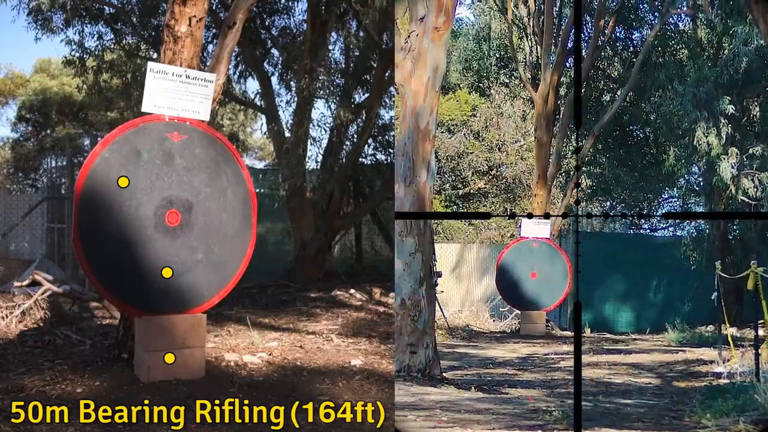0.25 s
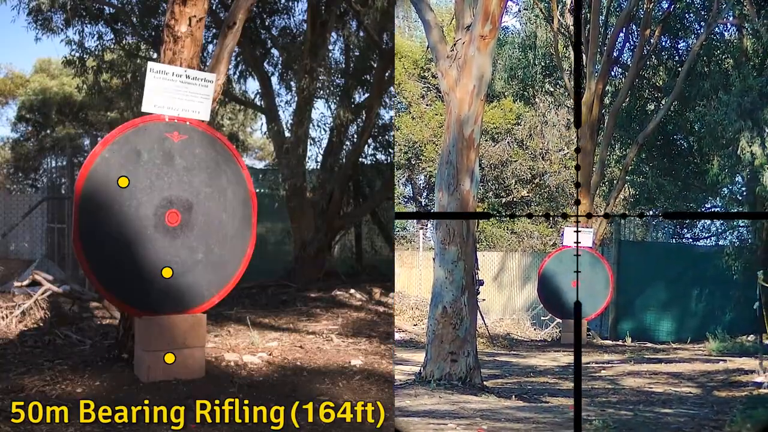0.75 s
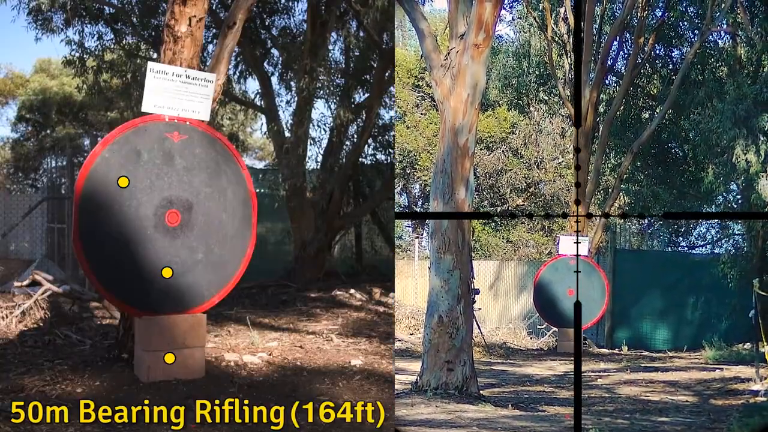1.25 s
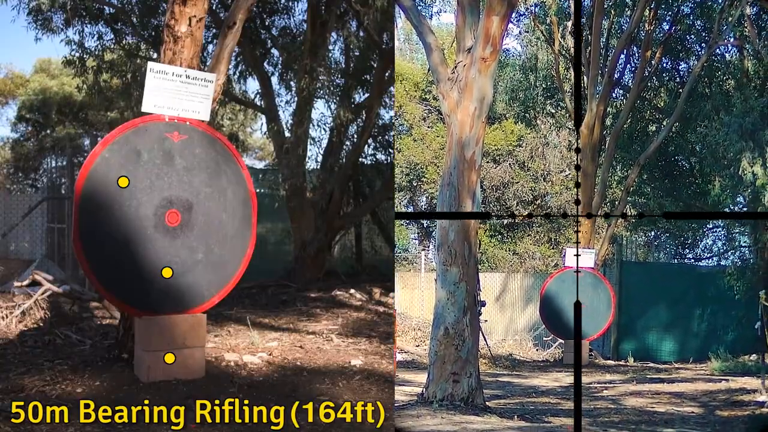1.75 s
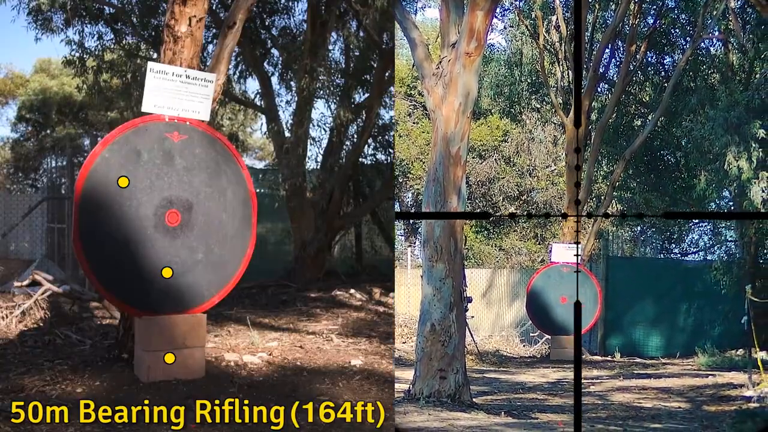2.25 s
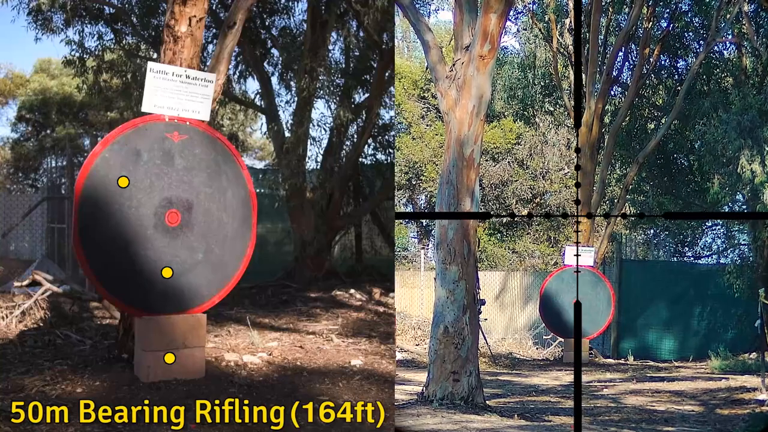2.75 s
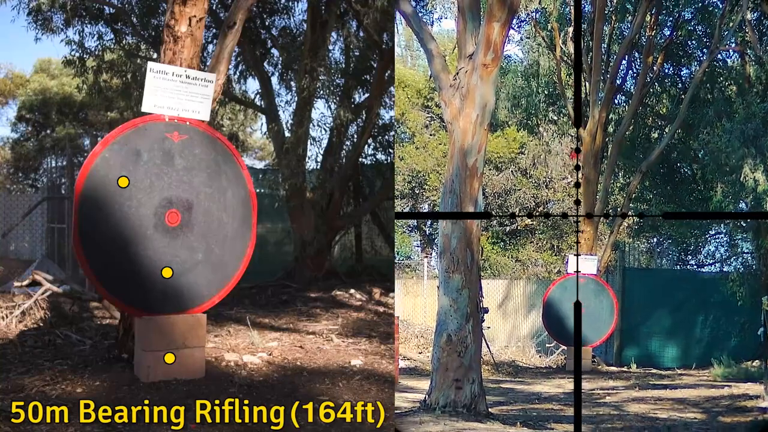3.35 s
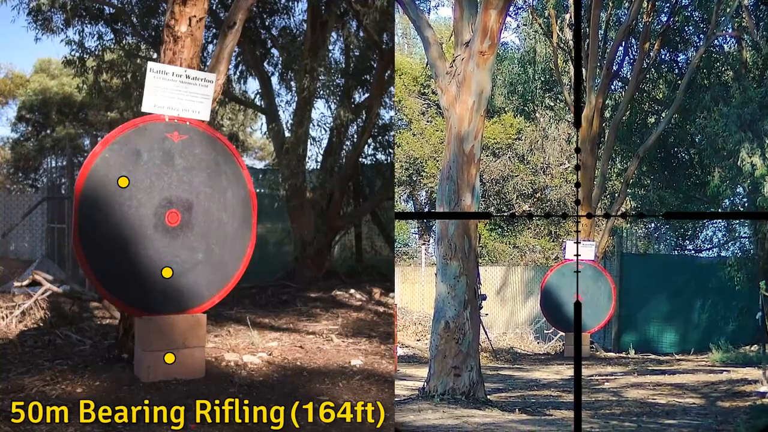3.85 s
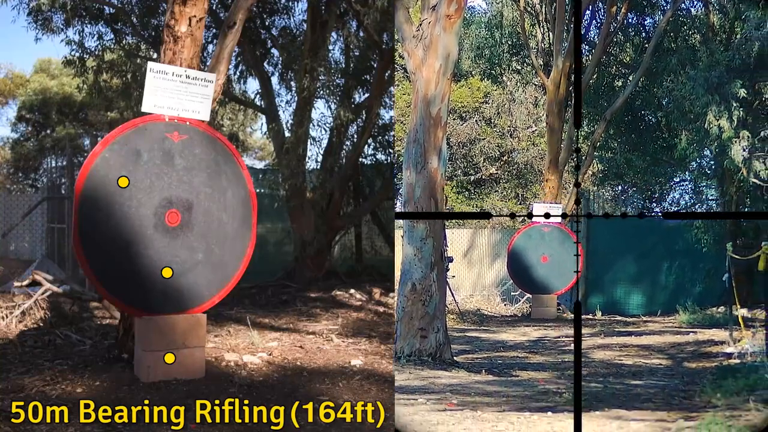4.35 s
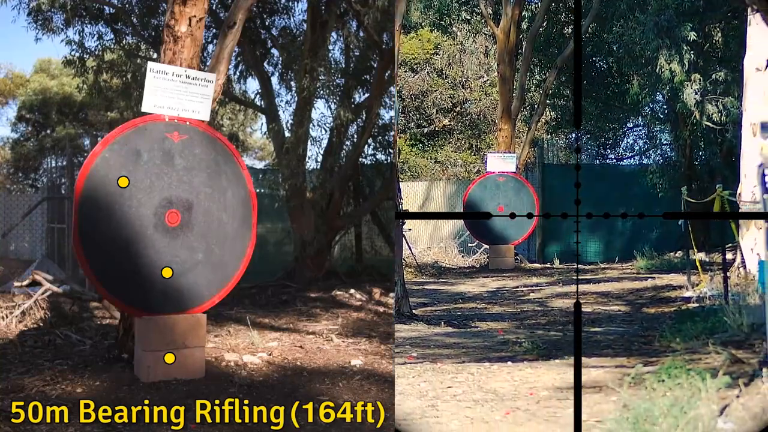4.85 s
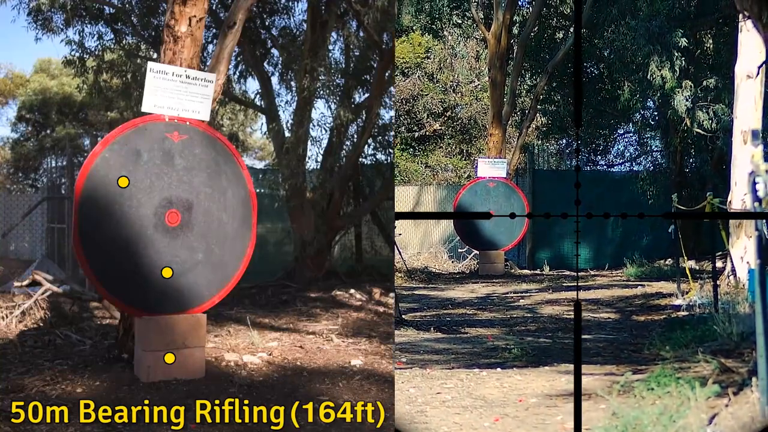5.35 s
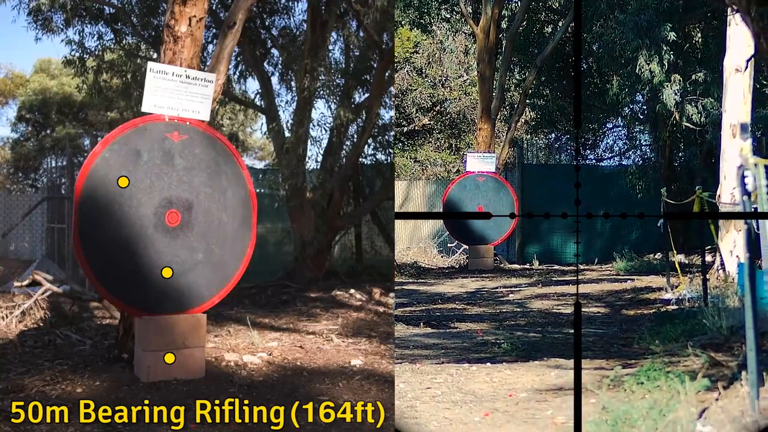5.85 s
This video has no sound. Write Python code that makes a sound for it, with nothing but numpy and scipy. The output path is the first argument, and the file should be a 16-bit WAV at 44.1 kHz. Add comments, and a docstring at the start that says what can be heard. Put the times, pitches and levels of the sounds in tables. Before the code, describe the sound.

Outdoors among trees, low wind rumble, faint leaf hiss and small chirping birds fill the first three seconds. Right beside the microphone a spring-powered plastic dart blaster fires once: a very quick crunching build-up, a loud clacking slam, low thump and ringing, rattling spring that dies away with small knocks. A faint pulsing whistle then falls in pitch as the dart flies, ending in a sharp, dry, hollow knock with short echoes.

```python
"""A yard with trees: a spring-powered foam dart blaster fires once, right beside the microphone.
Shaped noise bursts make the quick build-up, the slamming plunger and the knocks on the plastic shell;
damped sines make the ringing spring and thumping stock, and dense random clicks make the spring rattle.
The spinning dart whistles on two falling tones and lands with one dry, hollow knock of damped sines.
Filtered noise makes wind rumble, leaf hiss and twig ticks; gliding whistles make the small birds."""
import sys
import numpy as np
from scipy import signal
from scipy.fft import rfft, irfft, next_fast_len
from scipy.io import wavfile
from scipy.ndimage import uniform_filter1d, minimum_filter1d

SR = 44100
rng = np.random.default_rng(int(sys.argv[2]) if len(sys.argv) > 2 else 0)


def generate_wav(signal):
    """Clip the signal to [-1, 1] and save it as 16-bit WAV at the path in sys.argv[1]."""
    frames = np.transpose(np.atleast_2d(signal))
    scaled = np.clip(frames, -1, 1) * 32767
    pcm = np.round(scaled).astype(np.int16)
    wavfile.write(sys.argv[1], SR, pcm)


N = 269274
TIME = np.arange(N) / SR  # seconds

# The shot builds in three quick steps, each louder than the one before.
BUILD_S, BUILD_STEP_S, BUILD_DB, BUILD_RISE_DB, BUILD_T60_S = 3.017, .021, -43.5, 13, .14
# Blows on the shell, the release first.
# Each row: start in seconds, relative level in dB, t60 in seconds, tilt in dB per octave.
BLOWS = [(3.0795, -3, 0.055, -2.5), (3.086, -10, 0.067, 2), (3.158, -23.5, 0.11, 5.5),
         (3.194, -24, 0.066, 4.5), (3.262, -24.5, 0.13, 0.5), (3.353, -25, 0.24, -2),
         (3.556, -31, 0.17, -2.5), (3.697, -32, .07, -1.5), (3.743, -26, 0.056, -4),
         (3.7709, -17, .035, -5.5), (4.2928, -29.5, 0.024, -4.5)]
# The spring hits the end of its tube, the first time with the plunger. Each row: start in seconds,
# blow level in dB, blow tilt in dB per octave, ring level in dB, chatter level in dB (levels relative).
SURGES = [(3.1107, -7, 1.5, -32, -21.5), (3.401, -27.5, 2, -27.5, -32), (3.7035, -17.5, -1, -31, -48.5)]
SURGE_T60_S, RING_RISE_S = 0.059, 0.0045
CHATTER_RISE_S, CHATTER_HOLD_S, CHATTER_T60_S = .012, 0.077, 1.0
BLASTER_PAN_DB = 1  # left minus right
# Colour of the plastic shell. Each row: frequency in Hz, gain in dB.
SHELL_COLOUR = [(100, -8), (250, -7), (400, -4.5), (550, -0.5), (760, 2.5), (1050, -4), (1400, -1.5),
                (1700, -8), (2400, -9), (2800, -18.5), (3500, -14.5), (4500, -27), (6100, -27.5),
                (7200, -43), (9000, -72)]
# Long modes of the coil spring. Each row: frequency in Hz, relative level in dB, t60 in seconds.
SPRING_MODES = [(440, -12, 1.62), (449, -10.5, 1.2), (477, -8.5, .6), (548.5, -10, 0.97),
                (583.6, -5.5, 1.58), (659, -4, 0.45), (702, -4.5, 0.45), (790, -7, 0.38), (987, -4.5, 0.36),
                (1392, -2.5, 0.26), (1414, -7.5, 0.22)]
# Resonances of the coils chattering in their tube. Each row: frequency in Hz, width in Hz, gain in dB.
COIL_RESONANCES = [(450, 24, -1.5), (611, 30, -4.5), (676, 13, -3), (757, 12, -1.5), (740, 18, -4),
                   (865, 11, -5.5), (1000, 30, 1), (1070, 40, -2.5), (1330, 45, -5), (1504, 65, 5),
                   (1825, 71, 2.5), (1920, 45, 0), (2117, 60, -2.5), (2440, 99, -4), (2740, 77, -4.5),
                   (2990, 210, -4.5), (3226, 97, -5), (3540, 110, -8.5), (3870, 79, -22.5),
                   (5390, 250, -26), (6100, 230, -30)]
# Low modes of the stock. Each row: frequency in Hz, level in dB, t60 in seconds.
STOCK_MODES = [(69.1, -23.5, 0.94), (97.2, -11, 0.33), (124.4, -11, 0.24), (146.9, -18, .6),
               (155.4, -13, 0.79), (186, -22.5, 1), (253, -19.5, .1), (333, -18.5, .15)]
# Recoil of the whole blaster. Each row: frequency in Hz, level in dB, t60 in seconds.
RECOIL_MODES = [(25.7, -11, 0.33), (89.4, -10, 0.16)]
RECOIL_S, SLAM_S = 3.090, 3.114
# Flight of the dart as it slows and comes nearer.
# Each row: time in seconds, whistle centre pitch in Hz, relative level in dB.
FLIGHT = [(4.749, 5990, -89), (5.0, 5440, -79), (5.25, 4800, -74), (5.43, 4020, -68), (5.6, 3800, -66),
          (5.722, 3750, -63.5)]
# turns per second, then pitch depths as fractions, then the level sent to the tree echo
SPIN_HZ, SPIN_WOBBLE, WHISTLE_ROUGH, WHISTLE_ECHO_DB = 17.5, .02, .025, -9
# Hollow knock and the ticks after it.
# Each row: start in seconds, relative level in dB, tilt in dB per octave.
KNOCKS = [(5.7249, -1, 0.5), (5.7263, -13, -5.5), (5.781, -31, 1.5), (5.938, -33, -0.5), (5.942, -35, -8),
          (5.965, -38, 4)]
# Modes of the knocked thing. Each row: frequency in Hz, relative level in dB, t60 in seconds.
HOLLOW_MODES = [(453, -36.5, 0.84), (673, -51.5, .02), (940, -17, 0.044), (881, -27.5, 0.28),
                (1230, -39, 0.32), (1424, -8, 0.015), (1794, -17.5, 0.032), (1930, -40.5, 0.28),
                (2320, -39.5, 0.29), (2600, -28, 0.013), (4180, -25, 0.0058), (5830, -25, 0.0076),
                (7250, -39.5, 0.0085), (9400, -35, 0.0028)]
# Echoes of the knock off nearby surfaces. Each row: delay in seconds, level in dB.
KNOCK_SLAPS = [(.029, -22.5), (.056, -26.5), (.104, -32)]
# Bird calls, built of rising notes. Each row: delay in seconds, length in seconds, start in Hz,
# end in Hz (both before the pitch ratio), relative level in dB, second and third harmonic in dB.
TWO_STROKE = [(0, 0.03, 2130, 2720, -9, 8, -40), (.026, 0.027, 3500, 4250, 2, -40, -49),
              (.03, .05, 2400, 2840, -7, -40, -50)]
PEEP = [(0, .05, 2400, 2760, 0.0086, -6.5, -10)]
UPSWEEP = [(0.0011, .045, 2560, 3330, 0, -10.5, -32)]
LOW_PHRASE = [(0, 0.0555, 1070, 1384, -4.5, 2.5, -30), (.049, 0.0414, 1804, 2120, 2.5, -35, -45),
              (.087, .04, 1878, 2080, 1.5, -35, -45)]
LOW_SLUR = [(0.00054, 0.12, 1180, 1560, 0, -17, -35)]
# When each call is sung. Each row: start in seconds, relative level in dB, pitch ratio.
TWO_STROKE_AT = [(0, -57, 0.95), (.696, -56, .99), (1.787, -61.5, 1.09), (2.575, -56.5, 1.006)]
UPSWEEP_AT = [(.065, -59.5, 1.04), (.14, -60, 1.05), (.767, -62, 1.03), (1.23, -70, 1.07),
              (1.607, -63.5, .96), (2.286, -69.5, 1.1), (2.645, -63, 0.95)]
LOW_PHRASE_AT = [(4.819, -55.5, 1.0)]
LOW_SLUR_AT = [(5.09, -61.5, 0.98), (5.41, -69.5, 1.0)]
PEEP_S, PEEP_EVERY_S, PEEP_DB = .305, .626, -67  # one bird peeps at a steady pace
NOTE_WAVER = 0.022  # rms pitch waver, as a fraction
SONG_DB, SONG_ECHO_DB, SONG_T60_S = 0.5, -2, 0.59
# Blurred calls of far birds. Each row: centre time in seconds, spread in seconds,
# frequency in Hz, width of each filter pass in Hz, level in dB.
FAR_CALLS = [(.02, 0.47, 2130, 420, -64), (4.67, 0.3, 1070, 83, -64), (4.58, .22, 1680, 220, -71),
             (5.499, 0.15, 2120, 913, -63.5)]
# Spectra of the first and the quieter second background air.
# Each row: frequency in Hz, relative density in dB.
AIR_EARLY = [(20, -7), (43, 3), (97, -1.5), (150, -3.5), (293, -20), (446, -30.5), (1320, -31), (1820, -43),
             (2690, -46), (4100, -48), (4600, -56.5), (7220, -54.5), (9200, -62), (11200, -62.5),
             (11800, -50), (12600, -67), (15500, -65)]
AIR_LATE = [(20, 2), (49, -0.5), (86, -3), (127, -11), (179, -21), (350, -30.5), (620, -25.5), (790, -30.5),
            (950, -39.5), (1110, -36.5), (1900, -41), (2700, -52.5), (3800, -52.5), (5000, -58),
            (6100, -56), (7300, -59.5), (10500, -63), (12000, -79)]
EARLY_DB, LATE_DB, CHANGE_S = -37, -39.5, 2.88
# Wind rumble on the microphone. Each row: time in seconds, gain in dB.
WIND = [(0, -1), (.9, 1.5), (1.7, -0.5), (4.3, -4.5), (4.7, 0), (6.1, -1)]
# Stir of the leaves. Each row: time in seconds, gain in dB.
LEAVES = [(0, 4.5), (.6, 0), (3.0, 0), (4.7, 3.5), (5.3, 0.5), (6.1, 1.5)]
# Late gusts. Each row: centre time in seconds, spread in seconds, frequency in Hz, level in dB.
GUSTS = [(4.46, 0.06, 99.6, -36.5), (4.528, 0.038, 86.4, -39.5), (4.73, 0.044, 75, -38)]
# Dry ticks among the leaves. Each row: start in seconds, relative level in dB.
TWIGS = [(.017, -43.5), (0.518, -59), (2.204, -56), (2.48, -63), (4.136, -59.5)]
# Colour of the echo off trees and fence. Each row: frequency in Hz, relative gain in dB.
YARD_COLOUR = [(100, 10), (500, -18), (1800, -7.5), (2400, -4), (3300, -14.5), (8000, -26.5), (12000, -53)]
# Colour difference of the two microphone ports. Each row: frequency in Hz, left minus right in dB.
PORTS = [(60, -0.5), (250, -2), (500, 0.15), (2000, 0), (4500, 0.5), (9000, 2)]
TOP_HZ, LIMITER_SAMPLES = 15700, 89


def undb(db):
    """Turn decibels into gain."""
    return 10 ** (np.asarray(db) / 20)


def unit(x):
    """Scale to rms 1."""
    return x / np.sqrt(np.mean(x ** 2))


def fade(t, t60):
    """Exponential decay that drops 60 dB in t60 seconds."""
    return np.exp(-np.log(1000) * t / max(t60, 1e-3))


def add(out, s, x):
    """Mix x into out from time s on."""
    i = max(int(s * SR), 0)
    out[..., i:i + x.shape[-1]] += x[..., :N - i]


def colour(x, points, tilt_db=0):
    """Filter by a (Hz, dB) spectrum, tilted about 1 kHz in dB per octave."""
    size = next_fast_len(x.shape[-1], real=True)
    octave = np.log2(np.fft.rfftfreq(size, 1 / SR) + 1)
    hz, db = np.transpose(points)
    tilt = tilt_db * (octave - np.log2(1000))
    gain = undb(np.interp(octave, np.log2(hz), db) + tilt)
    return irfft(rfft(x, size) * gain, size)[..., :x.shape[-1]]


def resonate(x, modes):
    """Pass x through parallel (Hz, width, dB) resonances."""
    size = next_fast_len(x.shape[-1], real=True)
    f = np.fft.rfftfreq(size, 1 / SR) + 1e-6  # keeps clear of dividing by zero
    response = sum(undb(db) / (1 + 1j * (f * f - hz * hz) / (f * width)) for hz, width, db in modes)
    return irfft(rfft(x, size) * response, size)[..., :x.shape[-1]]


def ring(modes, scatter=0):
    """Damped sines set off by one blow; scatter loosens their phases."""
    t = TIME[:2 * SR]
    out = np.zeros(len(t))
    for hz, db, t60 in modes:
        cycles = hz * t + scatter * rng.random()
        out += undb(db) * fade(t, t60) * np.sin(2 * np.pi * cycles)
    return out


def stereo(mid, side, side_db):
    """Left and right from a middle signal and a side signal of opposite sign in each ear."""
    return mid + undb(side_db) * side * np.array([[1], [-1]])


def walk(rate):
    """Random wander with a spread near 1, from smoothed steps at the given rate in Hz."""
    k = int(SR / rate)
    steps = np.repeat(rng.standard_normal(N // k + 1), k)
    return np.sqrt(2) * uniform_filter1d(uniform_filter1d(steps, k), k)[:N]


def echo(x, spectrum, t60, rise_s):
    """Diffuse outdoor scatter that builds up and dies away, different in each ear."""
    t = TIME[:SR]
    noise = colour(stereo(*rng.standard_normal((2, SR)), side_db=-16.5), spectrum)
    tail = noise * fade(t, t60) * (1 - np.exp(-(t / rise_s) ** 2))
    tail /= np.sqrt(np.sum(tail ** 2) / 2)  # unit energy per ear on average
    return signal.fftconvolve(x[None], tail, axes=1)[:, :N]


def swell(s, spread_s, hz, width_hz, db):
    """A narrow band of noise that rises and falls about time s."""
    band = [(hz, width_hz, 0)]
    noise = unit(resonate(resonate(rng.standard_normal(N), band), band))
    return undb(db) * noise * np.exp(-((TIME - s) / spread_s) ** 2)


def crunch(db, t60, tilt_db):
    """One crunching noise burst coloured like the plastic shell: fast-dying, with a short soft onset."""
    t = TIME[:SR // 2]
    mid, side = rng.standard_normal((2, len(t)))
    side = colour(side, [(600, -1.5), (2500, -2.5), (5000, 6.5)])  # treble reaches the ports less alike
    shell = unit(colour(stereo(mid, side, side_db=-13.5), SHELL_COLOUR, tilt_db))
    pan = undb(np.array([[BLASTER_PAN_DB], [-BLASTER_PAN_DB]]) / 2)
    return undb(db) * pan * shell * fade(t, t60) * (1 - fade(t, 0.0045))


def build_up():
    """The shot builds in three quick steps of crunching noise, each louder than the one before."""
    out = np.zeros((2, N))
    for step in range(3):
        level_db = BUILD_DB + step * BUILD_RISE_DB
        add(out, BUILD_S + step * BUILD_STEP_S, crunch(level_db, BUILD_T60_S, tilt_db=0.4))
    return out


def release_and_knocks():
    """The catch lets go, then loose parts knock on the shell."""
    out = np.zeros((2, N))
    for s, db, t60, tilt_db in BLOWS:
        add(out, s, crunch(db, t60, tilt_db))
    return out


def spring_surges():
    """Each surge of the slack spring strikes the shell and sets the long modes of the coil ringing."""
    out = np.zeros((2, N))
    onset = 1 - np.exp(-TIME[:2 * SR] / RING_RISE_S)
    for s, db, tilt_db, ring_db, _ in SURGES:
        add(out, s, crunch(db, SURGE_T60_S, tilt_db))
        add(out, s, undb(ring_db) * ring(SPRING_MODES, scatter=0.87) * onset)
    return out


def shell_sound():
    """A small plastic shell radiates the blows and the ring, but neither deep bass nor fine treble."""
    out = build_up() + release_and_knocks() + spring_surges()
    return colour(out, [(40, -12.5), (120, 2), (7000, 1.5), (8500, -9.0), (10000, -41)])


def chatter():
    """The slack spring slaps its tube: dense uneven clicks that flare at each surge and die away."""
    t = TIME[:2 * SR] + SURGES[0][0]
    n = len(t)
    hits = (rng.random((2, n)) < 3200 / SR) * rng.standard_normal((2, n))  # 3200 clicks a second
    clicks = stereo(*hits, side_db=-10.5) * undb(1.5 * walk(89.96)[:n])
    coils = np.zeros((2, n))
    for mode in COIL_RESONANCES:
        # the contact point shifts along the coils, so each resonance comes and goes
        coils += resonate(clicks * undb(2.6 * walk(25)[:n]), [mode])
    body = unit(coils) + undb(-1.5) * unit(colour(clicks, SHELL_COLOUR, tilt_db=2.0))
    # the housing muffles the top
    body = colour(body, [(150, 13.5), (400, 9.5), (6200, -9.5), (7200, -17), (9000, -43)])
    flares = []
    for s, _, _, _, db in SURGES:
        rise = np.clip((t - s) / CHATTER_RISE_S, 0, 1)
        decay = fade(np.maximum(t - s - CHATTER_HOLD_S, 0), CHATTER_T60_S)
        flares.append(undb(db) * rise * decay)
    out = np.zeros((2, N))
    add(out, t[0], unit(body) * np.linalg.norm(flares, axis=0))  # flares add up in power
    return out


def thump():
    """Low damped modes: the blaster kicks at release, and its stock booms as the plunger lands."""
    out = np.zeros(N)
    add(out, RECOIL_S, -ring(RECOIL_MODES))
    add(out, SLAM_S, ring(STOCK_MODES))
    return out


def whistle():
    """The spinning dart whistles on two tones that pulse once a turn and fall as it slows, until it lands."""
    s, hz, db = np.transpose(FLIGHT)
    turn = 2 * np.pi * SPIN_HZ * (TIME - s[-1]) + .5 * walk(12)
    pitch = np.interp(TIME, s, hz) * (1 - SPIN_WOBBLE * np.sin(turn) + WHISTLE_ROUGH * walk(900))
    phase = 2 * np.pi * np.cumsum(pitch) / SR
    # the upper tone dies out as speed drops
    upper = np.interp(TIME, [5.0, 5.35], [1.3, 0]) * np.sin(1.26 * phase)
    pulses = (1 + .85 * np.cos(turn)) * undb(3 * walk(25) - 4.0)
    level = undb(np.interp(TIME, s, db, left=-140, right=-140))
    return pulses * (np.sin(phase) + upper) * level


def knocks():
    """The dart strikes something hollow: noise cracks and damped modes, a quick bounce, then faint ticks."""
    out, t = np.zeros(N), TIME[:SR]
    for s, db, tilt_db in KNOCKS:
        crack = undb(-29.0) * rng.standard_normal(SR) * fade(t, 0.024)
        hit = crack - ring(HOLLOW_MODES)[:SR]
        add(out, s, undb(db) * colour(hit, [(100, -12.5), (400, 0)], tilt_db))
    return colour(out, [(9800, -3), (11300, -16), (12500, -44)])


def call(notes, pitch):
    """One bird call: upward whistles with a wavering pitch and two overtones."""
    out = np.zeros(SR)
    for delay_s, length_s, start_hz, end_hz, db, second_db, third_db in notes:
        u = np.linspace(0, 1, int(length_s * SR))
        waver = NOTE_WAVER * unit(uniform_filter1d(rng.standard_normal(SR), size=40))[:len(u)]
        hz = pitch * (start_hz + (end_hz - start_hz) * u) * (1 + waver)
        phase = 2 * np.pi * np.cumsum(hz) / SR
        tone = np.sin(phase) + undb(second_db) * np.sin(2 * phase) + undb(third_db) * np.sin(3 * phase)
        envelope = np.sqrt(2 * np.abs(np.sin(np.pi * u)))
        add(out, delay_s, undb(db) * envelope * tone)
    return out


def birds():
    """Small birds sing five kinds of call, placed by their own times, levels and pitches."""
    out = np.zeros(N)
    peep_at = [(PEEP_S + k * PEEP_EVERY_S, PEEP_DB, 1) for k in range(5)]
    songs = [(TWO_STROKE, TWO_STROKE_AT), (PEEP, peep_at), (UPSWEEP, UPSWEEP_AT),
             (LOW_PHRASE, LOW_PHRASE_AT), (LOW_SLUR, LOW_SLUR_AT)]
    for notes, times in songs:
        for s, db, pitch in times:
            add(out, s, undb(db) * call(notes, pitch))
    return out


def far_birds():
    """Far calls, blurred into swelling narrow bands of noise."""
    return sum(swell(*far_call) for far_call in FAR_CALLS)


def air(spectrum):
    """Wind rumble and leaf hiss from noise; the bass is alike in both ears, the treble is wider."""
    mid, side = rng.standard_normal((2, N))
    side = colour(side, [(40, -31.5), (200, -13), (1000, -7.0), (6000, -3.5)])
    sound = unit(colour(stereo(mid, side, side_db=-2.0), spectrum))
    rumble = colour(sound, [(170, -0.5), (250, -10.0), (400, -33), (800, -71)])
    hiss = sound - rumble
    wind_db = np.interp(TIME, *np.transpose(WIND)) + 1.5 * walk(3.765)
    leaves_db = np.interp(TIME, *np.transpose(LEAVES)) + 0.13 * walk(9)
    return rumble * undb(wind_db) + hiss * undb(leaves_db)


def background_air():
    """Background air: one wind and leaf noise, then a quick change to a quieter one of another colour."""
    late = np.clip((TIME - CHANGE_S) / 0.014, 0, 1)
    return (1 - late) * air(AIR_EARLY) * undb(EARLY_DB) + late * air(AIR_LATE) * undb(LATE_DB)


def gusts():
    """Late gusts buffet the microphone as short low swells of noise."""
    return sum(swell(s, spread_s, hz, hz / 3, db) for s, spread_s, hz, db in GUSTS)


def twigs():
    """Twigs tick as short dry bursts of mid-treble noise."""
    out = np.zeros(N)
    for s, db in TWIGS:
        noise = rng.standard_normal(SR)
        snap = unit(colour(noise, [(1000, -13), (3000, 1), (4200, -2), (6000, -24), (12000, -28)]))
        add(out, s, undb(db) * snap * fade(TIME[:SR], 0.053))
    return out


def scene():
    """Blaster, flying dart, its knock and the birds, with their echoes in the windy yard."""
    blaster, dart, knock, song = shell_sound() + chatter(), whistle(), knocks(), birds()
    blaster_echo = echo(blaster.mean(axis=0), YARD_COLOUR, t60=0.98, rise_s=0.062)
    near = blaster + thump() + undb(-23) * blaster_echo
    tap = knock + undb(-20.0) * echo(knock, YARD_COLOUR, t60=0.6, rise_s=0.023)
    for delay_s, db in KNOCK_SLAPS:
        add(tap, delay_s, undb(db) * echo(knock, YARD_COLOUR, t60=0.074, rise_s=0.0029))
    canopy = echo(song + undb(WHISTLE_ECHO_DB) * dart,
                  [(1000, -1), (3000, -1), (6500, 2), (9000, -2)], t60=SONG_T60_S, rise_s=.008)
    background = background_air() + gusts() + twigs() + far_birds()
    return near + tap + dart + undb(SONG_DB) * song + undb(SONG_ECHO_DB) * canopy + background


def record(dry):
    """The two ports colour the sound; a fast limiter holds peaks to full scale, then the top is cut."""
    left, right = (colour(x, [(hz, sign * db / 2) for hz, db in PORTS]) for x, sign in zip(dry, (1, -1)))
    both = np.array([left, right])
    allowed = 1 / np.maximum(np.abs(both).max(axis=0), 1)
    held = minimum_filter1d(allowed, size=LIMITER_SAMPLES)
    gain = uniform_filter1d(held, size=LIMITER_SAMPLES)
    low_pass = signal.ellip(8, .2, 70, TOP_HZ, fs=SR, output="sos")
    return signal.sosfilt(low_pass, gain * both)


dry = scene()
out = record(dry)
generate_wav(out)
```